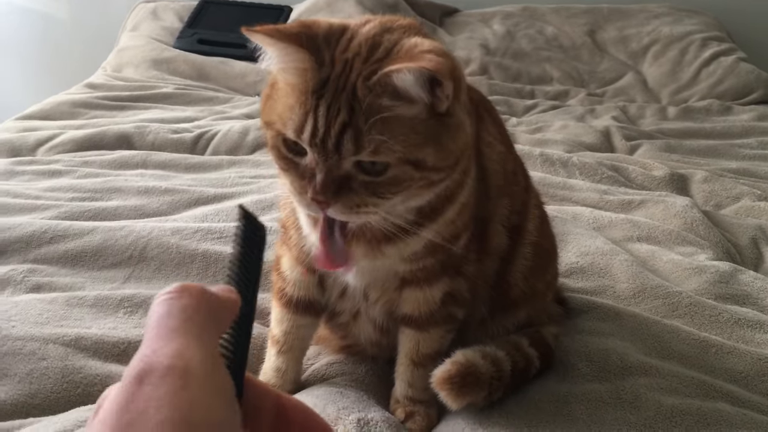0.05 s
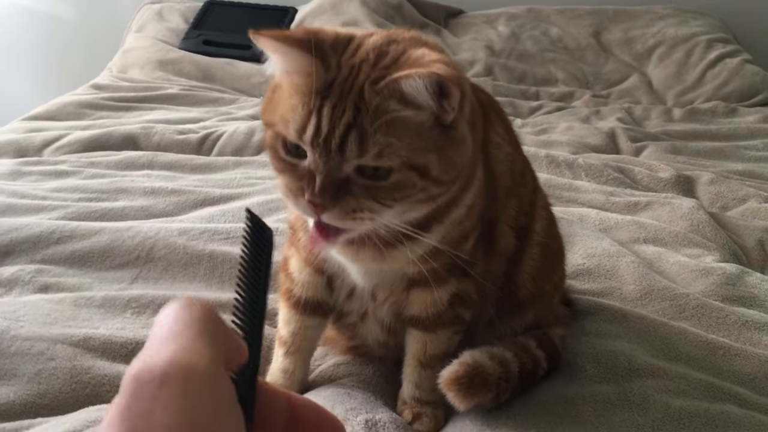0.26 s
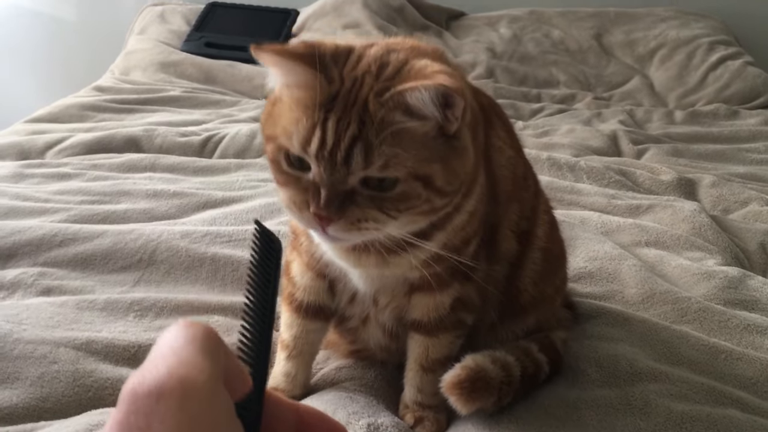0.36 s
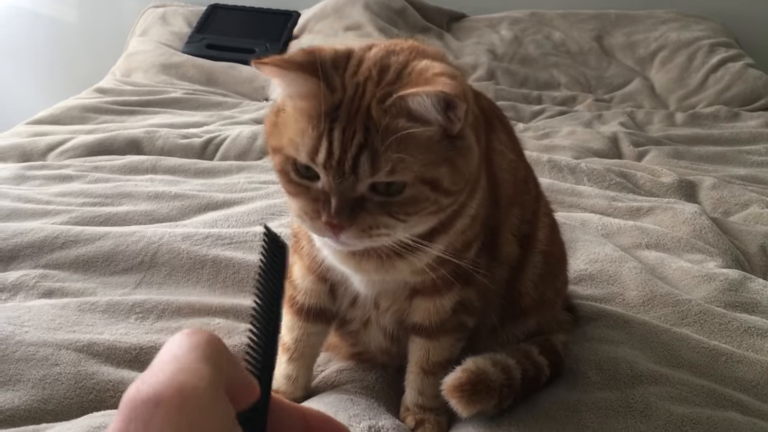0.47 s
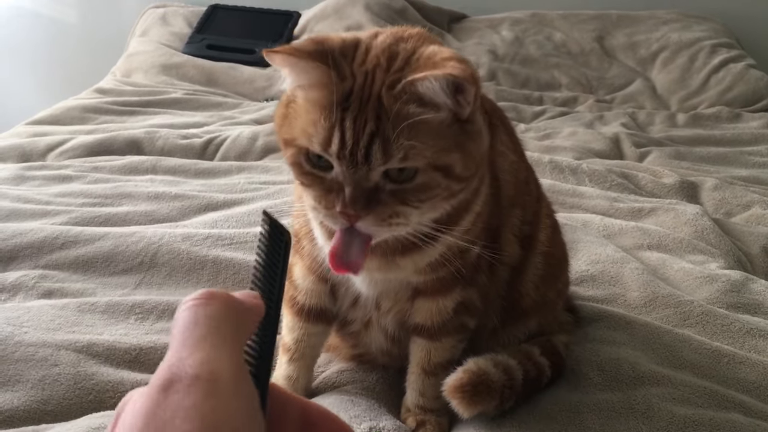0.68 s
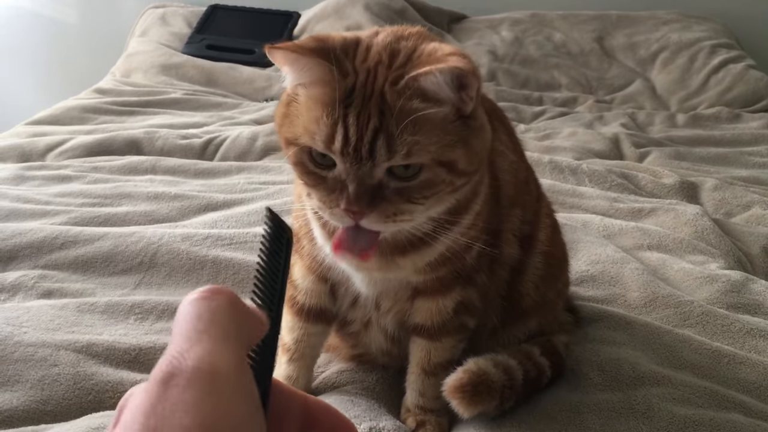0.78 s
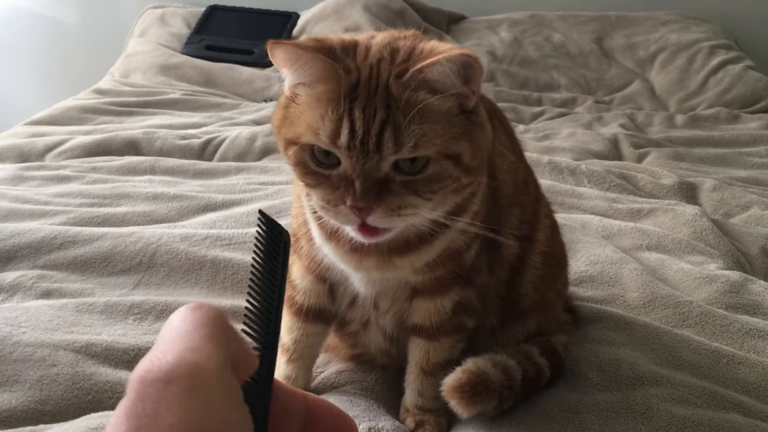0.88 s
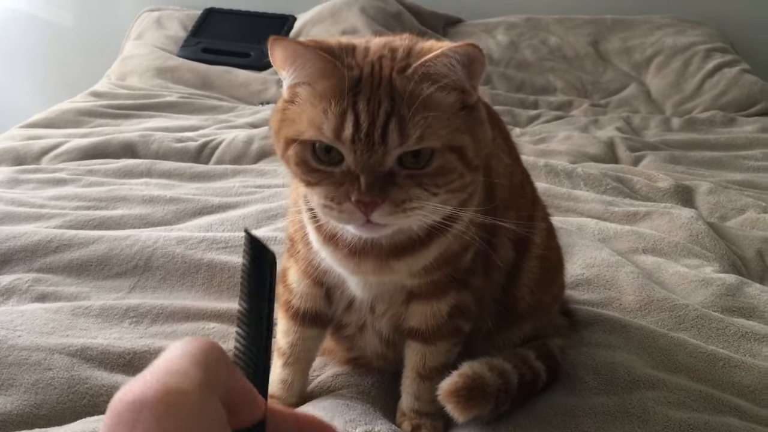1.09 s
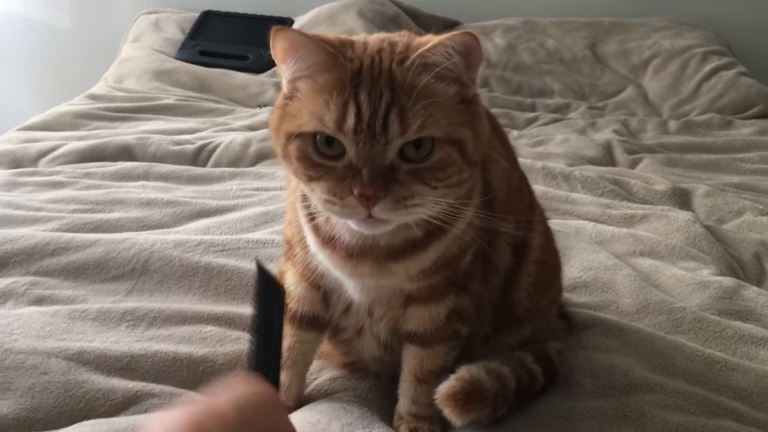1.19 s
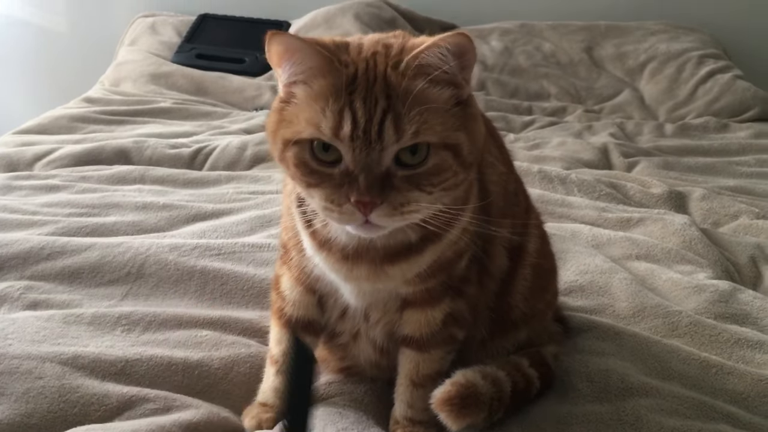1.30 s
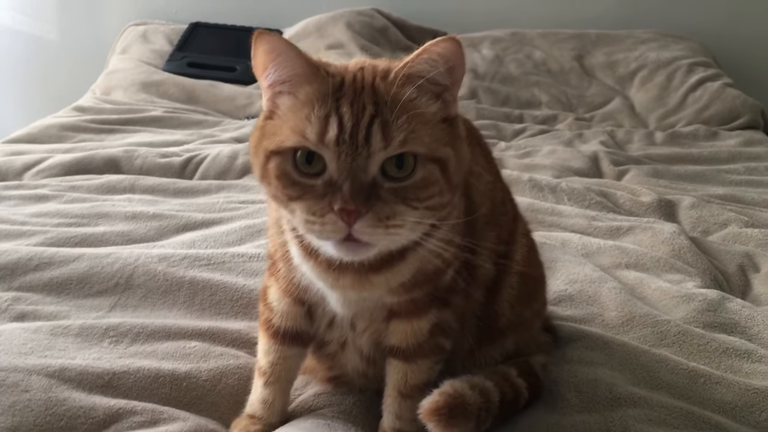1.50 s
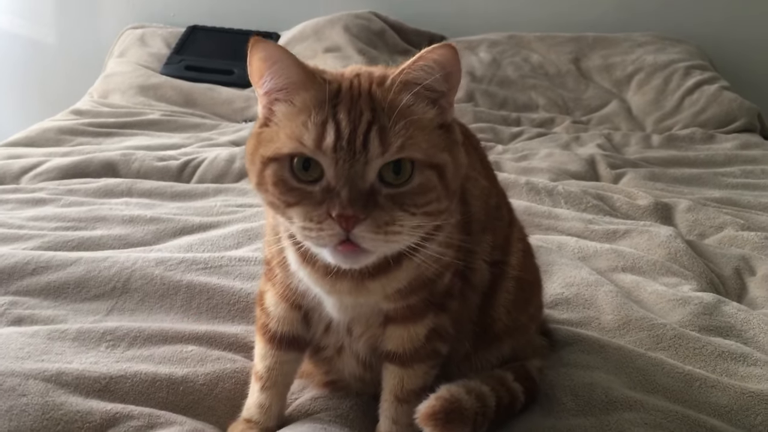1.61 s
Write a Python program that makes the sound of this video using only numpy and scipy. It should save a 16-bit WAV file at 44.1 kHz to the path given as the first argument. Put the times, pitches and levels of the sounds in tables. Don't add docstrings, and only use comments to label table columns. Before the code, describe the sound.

Two bursts of crisp plastic comb clicks, the second faster and a little louder, heard close up in a quiet bedroom with a soft echo, low air rumble, wavering phone microphone hiss and faint final cloth rustle.

```python
import sys
import numpy as np
from scipy import signal
from scipy.fft import rfft, irfft
from scipy.io import wavfile
from scipy.ndimage import uniform_filter1d

SR = 44100
rng = np.random.default_rng(int(sys.argv[2]) if len(sys.argv) > 2 else 0)


def generate_wav(sig):
    pcm = np.round(np.clip(np.atleast_2d(sig).T, -1, 1) * 32767).astype(np.int16)
    wavfile.write(sys.argv[1], SR, pcm)


def convert_level_to_amplitude(level_db):
    exponent = np.asarray(level_db, float) / 20
    return 10 ** exponent


N = 72765


def coloured(points):
    hz, db = np.array(points).T
    f = np.arange(N // 2 + 1) * SR / N + 1
    curve_db = np.interp(np.log(f), np.log(hz), db, left=-60, right=-60)
    x = irfft(rfft(rng.standard_normal(N)) * convert_level_to_amplitude(curve_db), N)
    return x / x.std()


def walk(rate):
    k = int(SR / rate)
    steps = np.repeat(rng.standard_normal(N // k + 1), k)
    return 1.4 * uniform_filter1d(uniform_filter1d(steps, k), k)[:N]


def lowpass(x, order, hz):
    return signal.sosfilt(signal.butter(order, hz, fs=SR, output="sos"), x)


def highpass(x, order, hz):
    return signal.sosfilt(signal.butter(order, hz, "high", fs=SR, output="sos"), x)


def add(out, s, x):
    i = int(s * SR)
    out[i:i + len(x)] += x[:N - i]


def ventilation_rumble():
    # (frequency [Hz], level [dB])
    rumble_colour = [(15, -42), (28, -19), (55, -3), (130, -2), (280, -10.5), (420, -15), (750, -20),
                     (1500, -48.5)]
    return coloured(rumble_colour) * convert_level_to_amplitude(-58 + 0.75 * walk(6.2))


def ventilation_hums():
    # (centre [Hz], width [Hz], level [dB])
    hum_bands = [
        (611.5, 31, -74),
        (235.4, 37, -72),
        (130.2, 6.6, -66.5),
        (4030, 440, -85),
    ]
    total = np.zeros(N)
    for hz, wide, db in hum_bands:
        total += convert_level_to_amplitude(db) * coloured([(hz - 2 * wide, -25), (hz, 0), (hz + 2 * wide, -25)])
    return total


def phone_hiss():
    # (frequency [Hz], level [dB])
    hiss_colour = [(530, -84), (900, 13.5), (1320, 8.5), (1440, 9.5), (3590, 8), (4980, 5), (15200, 7.5),
                   (16000, -3)]
    # (time [s], level [dB])
    hiss_gate = [
        (0, -63.5),
        (.17, -69),
        (.22, -65.5),
        (.8, -61),
        (1.199, -61),
        (1.44, -63),
        (1.47, -69),
        (1.65, -68.5),
    ]
    gate_s, gate_db = np.array(hiss_gate).T
    hiss_db = np.interp(np.arange(N) / SR, gate_s, gate_db)
    return coloured(hiss_colour) * convert_level_to_amplitude(hiss_db + 0.8 * walk(12))


def bedding_rustle():
    start_s, rise_s, hz, width_hz = 1.57, 0.04, 3400, 1100
    cloth = coloured([(hz - width_hz, -20), (hz, 0), (hz + width_hz, -12)])
    fade_in = np.clip((np.arange(N) / SR - start_s) / rise_s, 0, 1)
    return cloth * convert_level_to_amplitude(-74 + 1.5 * walk(45.8)) * fade_in


def room():
    # (delay [s], level [dB])
    wall_slaps = [
        (.0076, -24),
        (.0101, -21),
        (.0128, -27),
        (.0147, -23),
        (.018, -27),
    ]
    early_db, early_t60_s = -17, 0.072
    tail_db, tail_t60_s, tail_top_t60_s, tail_start_s = -11, 0.48, 0.35, 0.0047
    t = np.arange(SR // 2) / SR
    fade = -np.log(1000) * t

    slaps = np.zeros(len(t))
    for s, db in wall_slaps:
        i = int(s * SR)
        tap = rng.standard_normal(24) * np.exp(-np.arange(24))
        slaps[i:i + 24] += convert_level_to_amplitude(db) * tap / np.linalg.norm(tap)
    slaps = highpass(slaps, 1, 3500)

    echoes = rng.standard_normal(len(t)) * convert_level_to_amplitude(2.67 * rng.standard_exponential(len(t)))
    low = lowpass(echoes, 2, 8000)
    tail = low * np.exp(fade / tail_t60_s) + (echoes - low) * np.exp(fade / tail_top_t60_s)
    tail *= np.clip(t / tail_start_s - 0.5, 0, 1)
    early = echoes[::-1] * np.exp(fade / early_t60_s) * (t > wall_slaps[0][0])
    early *= convert_level_to_amplitude(early_db) / np.linalg.norm(early)
    tail *= convert_level_to_amplitude(tail_db) / np.linalg.norm(tail)
    return slaps + early + tail


def walls_colour(x):
    # (centre [Hz], width [Hz], share added)
    wall_bands = [
        (6020, 640, 0.15),
        (13500, 1600, -0.27),
        (7500, 1400, -0.24),
        (11300, 2400, 0.3),
    ]
    for hz, wide, share in wall_bands:
        x = x + share * signal.lfilter(*signal.iirpeak(hz, hz / wide, fs=SR), x)
    return signal.sosfilt(signal.ellip(8, 1, 50, 15750, fs=SR, output="sos"), x)


def ring(hz, t60, late=0., phase=0.):
    t = np.clip(np.arange(2048) / SR - late, 0, None)
    swell = 1 - np.exp(-t / 0.0001)
    return np.sin(2 * np.pi * hz * t + phase) * np.exp(-np.log(1000) * t / t60) * swell


def tooth(db, held_db, lower_db, upper_db, loose=1):
    # (frequency [Hz], level [dB], t60 [s])
    tooth_modes = [(2117, -14.5, 0.0048), (3300, -9.5, .005), (3910, -11, .005), (5397, 0, 0.0023),
                   (6660, -3, 0.0029), (8070, -4.5, 0.003), (9650, -9.5, 0.0057), (11380, -2, 0.0023),
                   (12910, -3.5, 0.0049), (13580, 0.5, 0.0044), (15130, -7, 0.0051), (15940, -4.5, 0.0062)]
    slip_s, scatter_db, detune, phase_spread = 0.000206, 1.2, 0.018, 0.32
    chance = loose * rng.standard_normal((len(tooth_modes), 4))
    teeth_part = 0
    for k, (hz, mode_db, t60) in enumerate(tooth_modes):
        louder, sharper, later, turned = chance[k]
        mode_db = mode_db + scatter_db * louder
        if hz < 4500:
            mode_db += lower_db
        elif hz < 12000:
            mode_db += upper_db
        hz = hz * (1 + detune * sharper)
        late = slip_s * abs(later)
        phase = np.pi * (k + phase_spread * turned) + 2 * np.pi * hz * late
        teeth_part = teeth_part + convert_level_to_amplitude(mode_db) * ring(hz, t60, late, phase)
    spine = convert_level_to_amplitude(-26) * ring(1526, 0.024, slip_s)
    held_spine = convert_level_to_amplitude(-21 + held_db) * ring(1235, 0.0069, slip_s)
    return convert_level_to_amplitude(db) * (teeth_part / 2 + spine - held_spine)


def comb():
    # (time [s], peak [dB], held spine mode [dB], lower modes [dB], upper modes [dB])
    snaps = [(0.2252, -18.5, -9.5, 7.5, 2.5), (0.2696, -17, -3, 3.5, -3), (0.3088, -15, -1.5, 2, 1),
             (0.3375, -14, -5, 0, -2.5), (0.3599, -15.5, -1, 4.5, 1.5), (0.4021, -15.5, -0.5, 1.5, 0.5),
             (0.4519, -14, -3, 2.5, 3), (0.4898, -13, 0, -1, -1), (0.5566, -15, 0, -5, 0),
             (0.8523, -19, 2.5, 1, -2.5), (0.8905, -15.5, -1, -0.5, 0), (0.912, -14.5, -2, 3.5, -2.5),
             (0.9451, -12, -6.5, 1.5, -4), (0.9701, -13, -2.5, 2, 0), (1.0029, -13.5, 0.5, 3, -2),
             (1.0277, -12.5, -3, 1, 1), (1.057, -13, 1, -1, -1.5), (1.086, -14.5, 2.5, -3.5, 2.5),
             (1.1077, -13.5, -0.5, -6, -2.5), (1.1248, -15.5, 1.5, 0, 4.5)]
    # (time [s], peak [dB], lower and upper modes [dB])
    grazes = [(0.1822, -41, 6.5), (.1990, -32.5, 1), (0.5742, -30.5, 5.5), (0.811, -31.5, 5),
              (.8280, -38, 9), (0.831, -40, -2), (0.836, -31, -2), (.8420, -29.5, 3.5), (0.85, -42, 0),
              (.864, -40, 8), (0.2233, -52, 9), (0.2674, -28, -7), (0.3985, -33, -9), (1.107, -27, 11.5),
              (1.2605, -40.5, 3), (1.3418, -51, 14), (1.443, -44.5, 2), (0.1312, -39, -5),
              (1.236, -56, -12)]
    # (time [s], peak [dB], pitch [Hz], t60 [s])
    ticks = [(.0745, -41, 7700, 0.0012), (.1255, -57, 2470, 0.03), (.1462, -42.5, 6400, 0.0022),
             (.2000, -35, 3300, 0.0046), (.5840, -32.5, 2030, 0.0086), (.5842, -31, 2900, 0.005),
             (0.5865, -28, 4160, 0.002), (.5885, -46, 2480, 0.018), (.590, -46, 4500, 0.012),
             (.592, -43, 3500, 0.0063), (1.232, -46, 3300, 0.0042), (1.234, -45.5, 2600, 0.0098),
             (1.2445, -42, 2080, 0.015), (1.242, -43, 2940, 0.0056), (1.262, -51, 4510, 0.018),
             (1.271, -47, 8750, 0.017), (1.2705, -50.5, 2090, 0.026)]
    lag_s = 0.0010
    near, far = np.zeros(N), np.zeros(N)
    strokes = list(snaps) + [(s, db, -3, modes_db, modes_db) for s, db, modes_db in grazes]
    for s, db, held, lower, upper in strokes:
        add(near, s + lag_s, tooth(db, held, lower, upper))
        add(far, s + lag_s, tooth(db, held, -3.5 + lower / 2, -2 + upper / 2, loose=0.6))
    for s, db, hz, t60 in ticks:
        tick = convert_level_to_amplitude(db) * ring(hz, t60)
        add(near, s, tick)
        add(far, s, tick)
    return highpass(near, 2, 600), walls_colour(far)


def scene():
    background = ventilation_hums() + ventilation_rumble() + phone_hiss() + bedding_rustle()
    near, far = comb()
    echo = signal.fftconvolve(far, room())[:N]
    return (near + echo + background)[None]


def low_pass(x):
    return signal.sosfilt(signal.butter(12, 17140, fs=SR, output="sos"), x)


def record(dry):
    top_cut = signal.butter(10, 16200, fs=SR, output="sos")
    mix = signal.sosfiltfilt(top_cut, dry)
    return low_pass(mix)


dry = scene()
out = record(dry)
generate_wav(out)
```